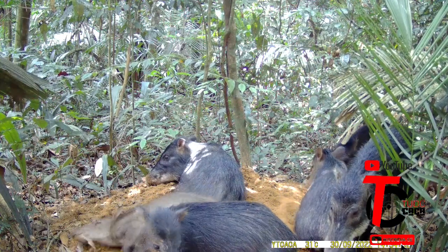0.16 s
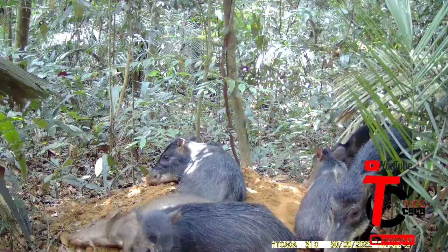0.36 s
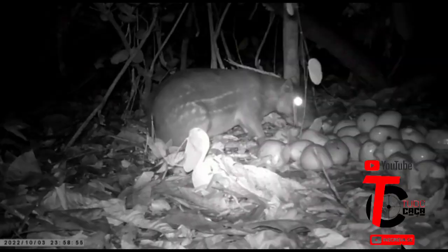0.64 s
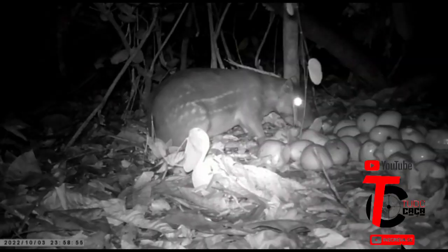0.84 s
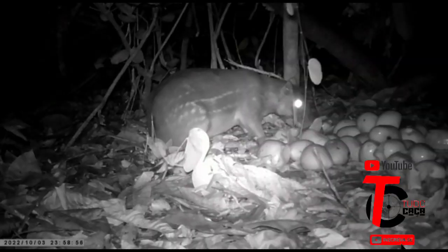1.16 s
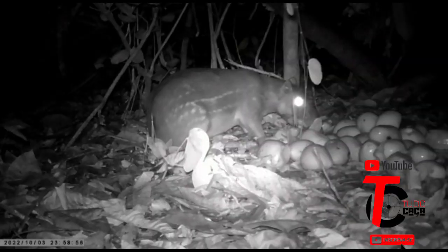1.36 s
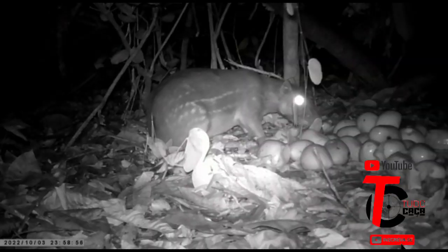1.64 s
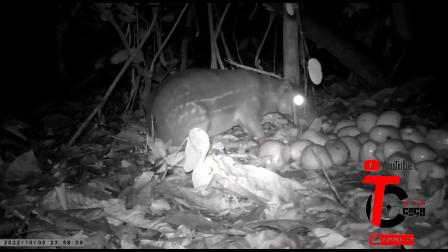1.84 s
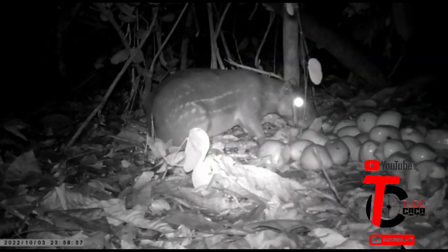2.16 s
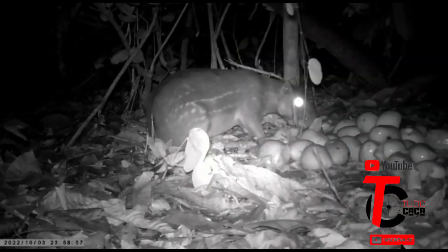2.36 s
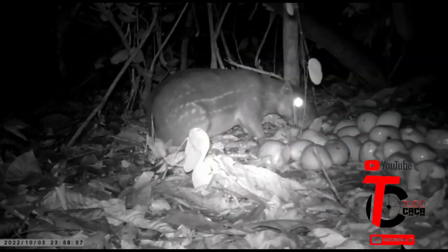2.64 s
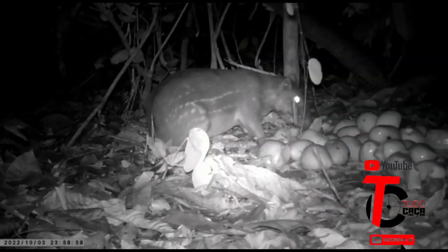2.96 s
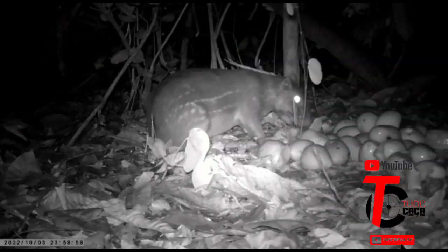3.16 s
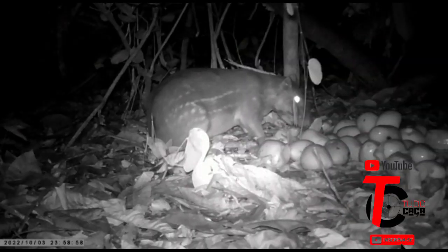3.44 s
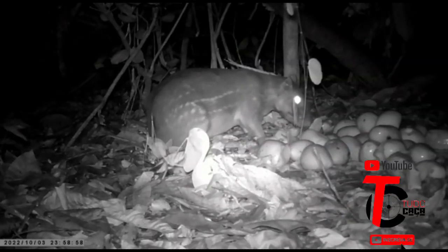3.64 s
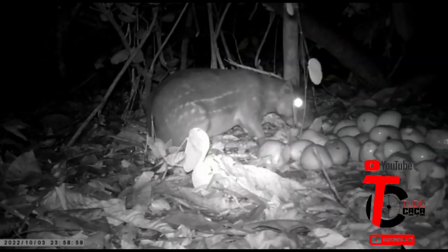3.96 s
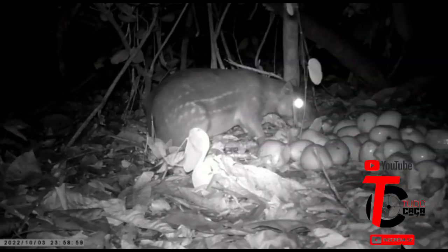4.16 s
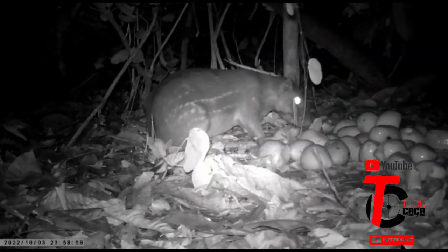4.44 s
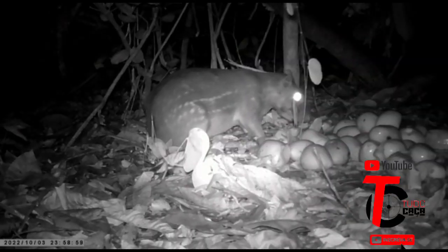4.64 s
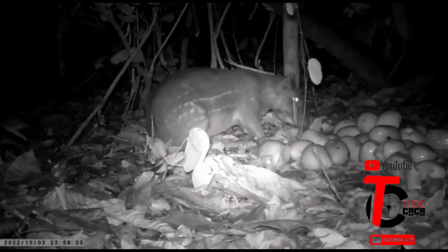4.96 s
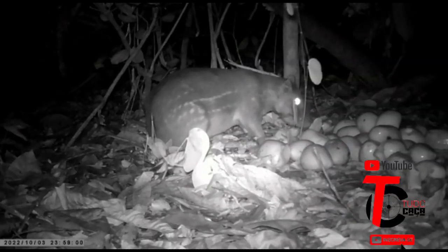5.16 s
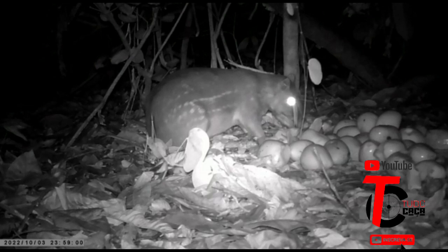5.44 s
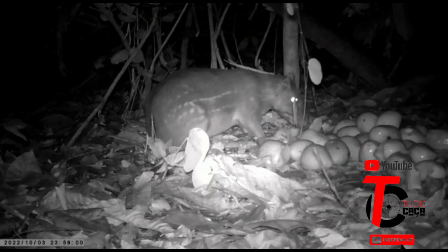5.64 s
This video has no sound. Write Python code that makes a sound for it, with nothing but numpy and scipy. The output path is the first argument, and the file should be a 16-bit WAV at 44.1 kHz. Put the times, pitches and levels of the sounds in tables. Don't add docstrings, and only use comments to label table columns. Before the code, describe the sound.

Dry leaves crackle and rustle under shuffling animals for half a second, then abruptly a quiet night chorus of crickets and katydids takes over.

```python
import sys
import numpy as np
from scipy import signal
from scipy.fft import rfft, irfft, next_fast_len
from scipy.io import wavfile
from scipy.ndimage import uniform_filter1d, map_coordinates

SR = 44100
rng = np.random.default_rng(int(sys.argv[2]) if len(sys.argv) > 2 else 0)


def store_pcm(level_fs):
    pcm = np.round(np.clip(level_fs, -1, 1) * 32767).astype(np.int16)
    wavfile.write(sys.argv[1], SR, np.atleast_2d(pcm).T)


def volts(x):
    e = np.asarray(x, float) / 20
    return 10 ** e


N = 256220
T = np.arange(N) / SR
CUT = 0.5548


def unit(x):
    return x / np.sqrt(np.mean(x ** 2) + 1e-20)


def noise():
    return rng.standard_normal(N)


def curves(rows):
    times, *columns = np.transpose(rows)
    return [np.interp(T, times, column) for column in columns]


def wobble(rate):
    knots = rng.standard_normal(int(N * rate / SR) + 4)
    return map_coordinates(knots, [T * rate])


def coloured(x, spectrum):
    size = next_fast_len(len(x) + 8192)
    hz, db = np.transpose(spectrum)
    log_hz = np.log(np.fft.rfftfreq(size, 1 / SR) + 1)
    gain = volts(np.interp(log_hz, np.log(hz + 1), db, left=-120, right=-120))
    return unit(irfft(rfft(x, size) * gain, size)[:len(x)])


def snaps(rows, gain_db, spiky_db):
    out, t = np.zeros(N + SR), T[:4096]
    lead = 256
    for start, db, hz, octaves, t60 in rows:
        decay_db = -60 * t / max(t60, 0.002)
        grains = rng.standard_normal(len(t)) * volts(spiky_db * rng.standard_normal(len(t)) + decay_db)
        grains[0] = -np.abs(grains).max()
        band = [(hz * 2 ** (n * max(octaves, 0.05)), -9 * n * n) for n in range(-2, 3)]
        burst = coloured(np.pad(grains, (lead, 0)), band)
        out[round(start * SR):][:len(burst)] += volts(db + gain_db) * burst / np.abs(burst).max()
    return out[lead:N + lead]


def strokes(rate, hz, fall_hz, length, scatter_db, first=0, slip=0, point=2):
    done = np.cumsum(rate) / SR + first + slip
    index = np.floor(done).astype(int)
    since = T - np.interp(index, done, T)
    u = np.clip(since / length, 0, 1)
    size = volts(scatter_db * rng.standard_normal(N // 100))[index % (N // 100)]
    tone = np.sin(2 * np.pi * since * (hz - fall_hz * u ** 2 / 3))
    return size * np.abs(np.sin(np.pi * u)) ** point * tone


def forest(x, wet_db, t60):
    t = T[:SR // 3]
    tails = rng.standard_normal((2, len(t))) * volts(-60 * t / t60) * (t > 0.004)
    wet = signal.fftconvolve(x[None], tails / np.linalg.norm(tails[0]), axes=1)[:, :N]
    turn = 1.45 * wobble(3)
    return x + volts(wet_db) * (np.cos(turn) * wet[0] + np.sin(turn) * wet[1])


def phrases(rows, rest_db):
    start, rise, fall, *levels = np.transpose(rows)[:, :, None]
    t = T[::100]
    effort = np.clip(np.minimum((t - start) / rise, (start + rise + fall - t) / fall), 0, 1)
    power = np.sin(np.pi / 2 * effort) ** 1.4
    out = []
    for db, rest in zip(levels, rest_db):
        sung = np.sum(power * volts(2 * db), axis=0)
        out.append(10 * np.log10(volts(2 * rest) + np.interp(T, t, sung)))
    return out


# t/s, shuffling level/dB, hoof weight level/dB
SHUFFLE = [(0.0, -54.5, -3), (0.108, -45.5, -6.5), (0.25, -41.5, -5.5), (0.286, -43, 3), (0.306, -41, -5),
           (0.4, -37, -10), (0.46, -45.5, -5), (0.508, -40.5, -3), (0.553, -41, 2)]
# t/s, peak level/dB, centre f/Hz, t60/s
BREAKS = [(.039, -37, 8900, 0.009), (.067, -27, 11000, .012), (0.076, -21, 5160, 0.14),
          (.1, -31, 11000, .06), (.162, -36, 675, 0.026), (0.207, -24, 8000, 0.03),
          (0.2123, -13.5, 3250, 0.016), (.216, -22.5, 5000, 0.075), (.265, -20, 1700, 0.037),
          (0.2652, -31, 550, .015), (0.2773, -11, 3580, 0.014), (.281, -14.5, 2300, 0.03),
          (0.287, -16, 1600, 0.021), (.291, -23, 990, 0.023), (0.337, -18.5, 4500, 0.021),
          (.342, -18, 3760, 0.048), (0.349, -27, 4400, .07), (0.402, -20, 5500, 0.021),
          (0.405, -27, 6000, 0.06), (.48, -27, 10000, .015), (.5, -26, 890, 0.022), (.503, -32, 11500, .04),
          (.52, -25.5, 1200, 0.038), (.547, -25, 2510, 0.011), (.551, -23.5, 8000, 0.012)]
# f/Hz, level/dB per Hz
LEAF_SPECTRUM = [(590, -23), (1000, -3), (1730, -4.5), (1820, -3.5), (2430, 1), (2650, 0.5), (5090, 1),
                 (10000, -11), (13000, -41), (22000, -120)]
# f/Hz, level/dB per Hz
THUD_SPECTRUM = [(35, -50), (60, -11), (96, -11), (628, -6.5), (817, -9), (1430, -8.5), (2000, -11),
                 (2600, -22), (4400, -120)]
# f/Hz, level/dB per Hz
CRISP_SPECTRUM = [(4120, -5.5), (7000, -4.5), (7890, -15), (12000, -10), (14100, -17), (15500, -26)]


def litter():
    rustle_db, thud_db = curves(SHUFFLE)
    crisp_db = -2 - 0.24 * (rustle_db + 44)
    breaks = []
    for start, db, hz, t60 in BREAKS:
        octaves = 1.12 + 0.01 * (db + 19.5) - 0.12 * abs(np.log2(hz / 2000))
        breaks.append((start, db, hz, octaves, t60))
    clumps_db = 0.9 * wobble(90) + 1.8 * wobble(500)

    def crackle(spiky_db):
        return noise() * volts(clumps_db + spiky_db * noise())

    leaves = coloured(crackle(3.9), LEAF_SPECTRUM)
    hooves = volts(thud_db - 3.5) * coloured(crackle(3.4), THUD_SPECTRUM)
    crisp = volts(crisp_db) * coloured(crackle(1.8), CRISP_SPECTRUM)
    bed = leaves + hooves + crisp
    return volts(rustle_db + 2.0) * bed + snaps(breaks, gain_db=-4.0, spiky_db=-1.0)


# f/Hz, level/dB per Hz
HISS_SPECTRUM = [(20, 1), (60, -2), (150, -10.5), (400, -16.5), (1000, -22), (2200, -27), (3500, -28.5),
                 (7500, -31), (12000, -32), (15600, -33)]


def microphone_hiss():
    return volts(-57.5 + 0.65 * wobble(8.8)) * coloured(noise(), HISS_SPECTRUM)


# start t/s, end t/s
FAST_SPELLS = [
    (1.4489, 1.8886),
    (3.1712, 3.593),
    (4.8324, 5.2732),
]
RESTING_RATE = [66.667, 66.212, 67.165, 66.936]


def tempo():
    away = np.min([np.maximum(start - T, T - end) for start, end in FAST_SPELLS], axis=0)
    fast = np.clip(0.5 - away / 0.02, 0, 1)
    resting = np.take(RESTING_RATE, np.searchsorted(np.mean(FAST_SPELLS, axis=1), T))
    excited = 7.332 * np.exp(-np.maximum(away, 0) / 0.1288)
    return fast * 89.378 + (1 - fast) * (resting + excited)


def low_cricket():
    rate = tempo()
    calm = uniform_filter1d(1. * (rate > 80), size=900)
    slip = (0.02 - 0.017 * calm) * wobble(22) + (0.007 - 0.005 * calm) * wobble(70)
    song = strokes(rate, hz=2912, fall_hz=115, length=0.0099 - 0.0004 * calm, scatter_db=1.2,
                   first=0.98, slip=slip, point=0.9 + 0.2 * calm)
    ground = volts(-13 + 4 * wobble(30)) * np.roll(song, 205)
    trunk = volts(-23) * np.roll(song, 279)
    song = forest(song + ground + trunk, wet_db=-17, t60=0.2)
    return volts(-53 + 0.8 * calm) * unit(song)


# t/s, level/dB
CHORUS_LEVEL = [(.6, -60), (1, -56.5), (1.2, -61.5), (1.5, -55), (2.2, -58), (2.8, -61), (3.45, -56),
                (3.85, -59), (4.25, -62.5), (4.6, -59.5), (4.95, -56), (5.3, -57.5), (5.7, -56),
                (5.81, -65)]
# wing f/Hz, spread of f/Hz, strokes per s
CHORUS_VOICES = [
    (6005, 12, 51),
    (6105, 25, 55),
    (6225, 35, 52.5),
    (6635, 35, 32),
]
VOICE_LEVEL = [-0.5, -1, 0.5, -12.5]
# start t/s, rise t/s, fall t/s, level/dB
LOWEST_SOLO = [
    (.45, .25, 0.39, -61),
    (1.6, .4, .45, -55),
    (4.7, 0.24, .3, -54),
]
# f/Hz, level/dB per Hz
CROWD_SPECTRUM = [(5550, -19), (5750, -16), (5920, -6), (6150, -0.5), (6400, -1.5), (6550, -10),
                  (6720, -15), (6880, -26), (7400, -39)]


def chorus():
    out = volts(-56.0 + 0.65 * wobble(3.1) + 1.6 * wobble(16)) * coloured(noise(), CROWD_SPECTRUM)
    levels = [curves(CHORUS_LEVEL)[0] + db for db in VOICE_LEVEL]
    levels[0], = phrases(LOWEST_SOLO, [levels[0]])
    for level_db, (hz, spread_hz, rate) in zip(levels, CHORUS_VOICES):
        singers = np.zeros(N)
        for place, r in zip([-1, 0, 1], rng.standard_normal(3)):
            pace = rate * (1 + 0.04 * r + 0.02 * wobble(8))
            song = strokes(pace, hz + spread_hz * place, fall_hz=40, length=0.016, scatter_db=1.8,
                           first=5 + r, point=1.3)
            singers += volts(1.8 * wobble(4)) * song
        out += volts(level_db - 0.5) * unit(forest(singers, wet_db=-4.0, t60=0.4))
    return out


# start t/s, rise t/s, fall t/s, near level/dB, far level/dB
KATYDID_PHRASES = [(.48, .02, .2, -55, -57), (.88, .14, .28, -53, -55), (1.26, .33, 0.36, -58.5, -56),
                   (1.84, 0.16, 0.054, -58, -58), (2.04, .16, .09, -54, -58.5), (2.26, .11, .06, -48, -59),
                   (2.4, .23, 0.085, -53, -56), (2.86, 0.24, 0.094, -49, -53.5),
                   (3.16, 0.096, .12, -55.5, -58), (3.35, 0.4, .11, -50.5, -57.5),
                   (3.71, 0.17, 0.056, -57.5, -57), (3.99, .2, 0.064, -48, -59),
                   (4.23, 0.36, .32, -47, -55.5), (4.8, .29, .1, -55, -62), (5.14, .15, .41, -58, -56),
                   (5.65, 0.25, .03, -48.5, -61)]
# start t/s, rise t/s, fall t/s, level/dB
WHISTLE_PHRASES = [(.9, .25, .15, -73), (1.3, 0.33, .3, -72), (2.85, .25, .3, -74), (3.6, .2, .15, -77),
                   (4.5, 0.27, .2, -77), (5.05, .09, .08, -72), (5.22, .07, .2, -72)]
# f/Hz, level/dB per Hz
DRONE_SPECTRUM = [(3650, -35), (3900, -15.5), (4150, -5.5), (4400, 3), (4600, 2), (4850, -7.5), (5100, -25)]
# f/Hz, level/dB per Hz
BUZZ_SPECTRUM = [(4350, -22), (4550, -16.5), (4680, 0.5), (4820, -10.5), (4960, -5.5), (5150, -38)]
# f/Hz, level/dB per Hz
OCTAVE_SPECTRUM = [(7800, -39), (8400, -8), (9250, 2), (9900, -6), (10800, -18)]
# f/Hz, level/dB per Hz
HIGH_SPECTRUM = [(4600, -7), (4900, -0.5), (5050, -2.5), (5250, 1.5), (5500, -5), (5700, -1.5), (6000, -35)]


def katydids():
    buzz_db, drone_db = phrases(KATYDID_PHRASES, rest_db=[-63, -61])
    high_db = -58 + 0.56 * (buzz_db + 55)
    whistle_db, = phrases(WHISTLE_PHRASES, rest_db=[-80])

    def scrape(rate, depth):
        cycles = np.cumsum(rate + 5 * wobble(6.5)) / SR
        return (1 + depth * np.cos(2 * np.pi * cycles)) * noise()

    drone = volts(0.58 * wobble(21)) * coloured(scrape(86, 0.13), DRONE_SPECTRUM)
    buzz = coloured(scrape(120, 0.6), BUZZ_SPECTRUM)
    octave = volts(-22.5) * coloured(scrape(120, 0.33), OCTAVE_SPECTRUM)
    high = volts(1.0 * wobble(15)) * coloured(scrape(120, 0.11), HIGH_SPECTRUM)
    whistle_band = [(8400, -20), (8650, -14), (8710, -19), (8780, -9), (8950, -18)]
    whistle = coloured(scrape(50, 0.25), whistle_band)
    near = volts(buzz_db - 2.5) * (buzz + octave)
    far = volts(drone_db + 0.5) * drone
    return far + near + volts(high_db + 0.1) * high + volts(whistle_db - 0.5) * whistle


# t/s, peak level/dB, centre f/Hz, width/octaves, t60/s
LEAF_TICKS = [(.9, -60, 2300, .7, .02), (1.197, -63, 9000, .2, .02), (1.322, -60, 7300, .2, .015),
              (1.355, -54.5, 7800, .5, .05), (1.359, -56, 2300, .8, .02), (1.515, -49, 7400, .25, .012),
              (2.301, -57, 7000, .15, .01), (2.488, -62, 7500, .15, .03), (2.5065, -56, 8200, .3, .05),
              (2.515, -66, 3600, .1, .05), (2.76, -63, 7300, .2, .01), (3.32, -55, 4500, 1.1, .012),
              (5.1, -67, 1500, .08, .04), (5.21, -68, 1400, .12, .09)]


def ticks():
    return snaps(LEAF_TICKS, gain_db=4.5, spiky_db=1)


# start t/s, end t/s, strokes per s, peak level/dB
NEAR_BURSTS = [
    (4.432, 4.451, 53, -45),
    (4.4535, 4.638, 54, -39.5),
    (4.723, 4.99, 52.4, -38.5),
    (5.642, 5.66, 51, -45),
    (5.661, 5.738, 51, -39),
]


def near_cricket():
    out = np.zeros(N)
    for start, end, rate, db in NEAR_BURSTS:
        song = strokes(np.full(N, rate), hz=6270, fall_hz=30, length=0.0144, scatter_db=1.2,
                       first=-start * rate, slip=0.005 * wobble(40), point=1.2)
        out += volts(db) * ((T > start) & (T < end)) * song
    return forest(out, wet_db=-15, t60=0.15)


def scene():
    hiss = microphone_hiss()
    day = litter() + volts(-6.0) * hiss
    night = low_cricket() + chorus() + katydids() + ticks() + near_cricket() + hiss
    fade = np.clip((T - CUT) / 0.017, 0.05, 1) ** 1.2
    return np.where(T < CUT, day, fade * night)[None]


def roll_off(x):
    return signal.sosfilt(signal.butter(12, 15670, fs=SR, output="sos"), x)


def record(dry):
    passed = np.fft.rfftfreq(N, 1 / SR) < 15670
    mix = irfft(rfft(dry) * passed, N)
    return roll_off(mix)


dry = scene()
out = record(dry)
store_pcm(out)
```